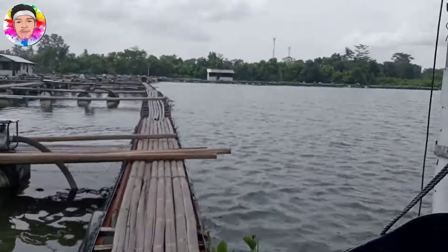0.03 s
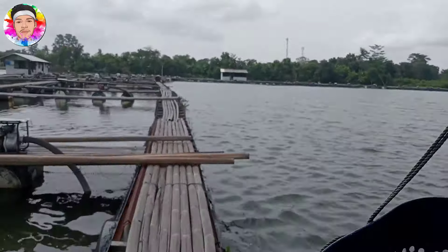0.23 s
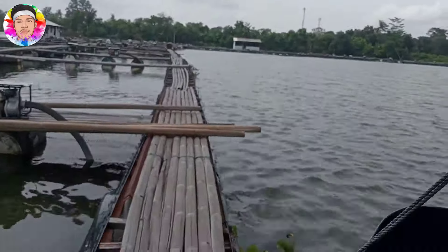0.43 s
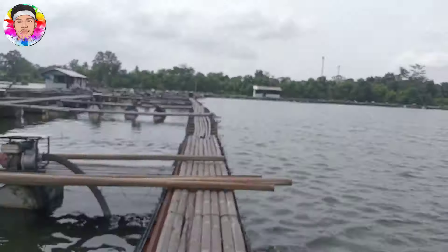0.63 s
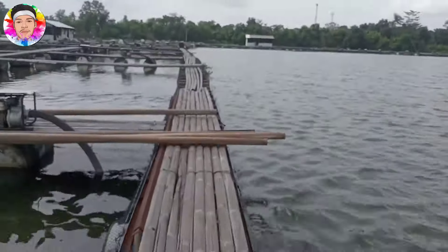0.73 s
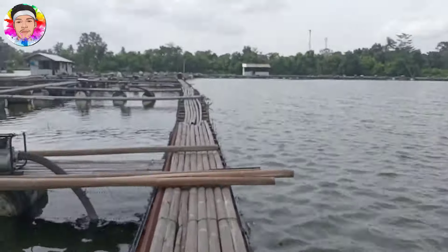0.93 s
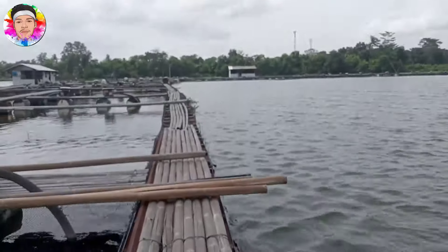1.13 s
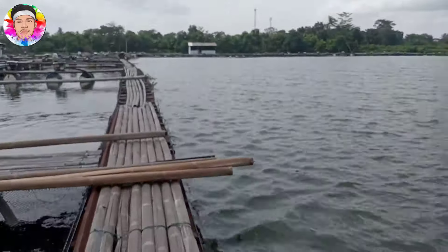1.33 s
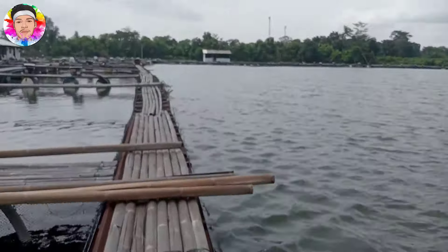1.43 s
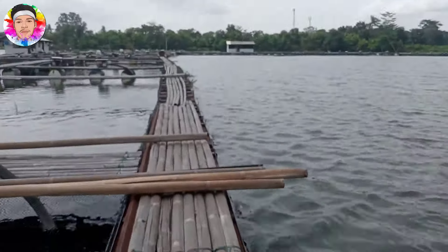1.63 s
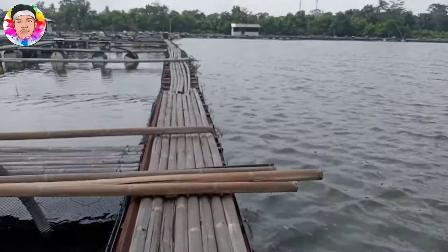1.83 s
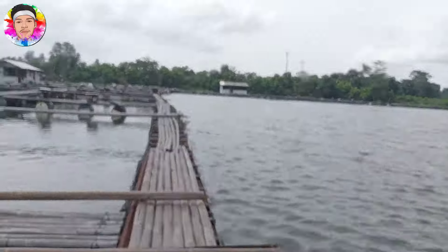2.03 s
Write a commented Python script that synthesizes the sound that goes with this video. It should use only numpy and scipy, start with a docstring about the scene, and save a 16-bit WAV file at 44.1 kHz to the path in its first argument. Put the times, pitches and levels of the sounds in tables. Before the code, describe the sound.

Footsteps knock on the hollow slats of a floating bamboo walkway at about 0.2, 0.7, 1.1 and 1.6 seconds, the second loudest. Soles scuff, with small dry snaps and loose slats rattling between steps. Low wind rumble and a soft hiss run throughout. The walkway groans softly near 0.4 and 1.8 seconds, and a distant bird whistles very faintly around 0.3 to 0.5 seconds.

```python
"""A floating walkway of bamboo slats on a lake, in light wind, with someone walking across it. Wind and the
swaying walkway rumble under a soft hiss, and a far bird whistles faintly. Each footstep lands as a few knocks
that ring the hollow slats, and the loose ones clatter on in between. The soles scuff the hard bamboo skin, dry
snaps and ticks sound, and the walkway groans as it flexes."""
import sys
import numpy as np
from scipy.fft import rfft, irfft, next_fast_len
from scipy.io import wavfile
from scipy.ndimage import uniform_filter1d, map_coordinates

SR = 44100
rng = np.random.default_rng(int(sys.argv[2]) if len(sys.argv) > 2 else 0)


def put_to_file(sound):
    """Save the sound as 16-bit audio at rate SR, in the file named by the first command-line argument."""
    columns = np.atleast_2d(sound).T  # one column per channel
    safe = np.clip(columns, -1, 1)
    whole_steps = np.round(safe * 32767)
    wavfile.write(sys.argv[1], SR, whole_steps.astype(np.int16))


N = 92610

# Low rumble of wind and the swaying walkway, swelling with its dull thumps: (time [s], level [dB])
RUMBLE_LEVEL = [(0,-26),(.19,-26.5),(.22,-22.5),(.3,-23.5),(.45,-21),(.6,-26.5),(.66,-28),(.79,-20.5),(.85,-27),(.96,-30),(1.05,-25),(1.11,-26.5),(1.26,-23.5),(1.33,-26),(1.52,-33),(1.65,-23),(1.75,-28.5),(1.86,-26),(1.93,-37),(1.99,-25),(2.1,-39.5)]
# Tone of the low rumble: (frequency [Hz], gain [dB])
RUMBLE_EQ = [(25, -52), (53, -7.5), (90, -1.5), (130, -0.5), (200, -5.5), (300, -22), (600, -80)]
# Tone of the airy hiss: (frequency [Hz], gain [dB])
HISS_EQ = [(100, -36.5), (200, -2.5), (370, -3.5), (780, -11.5), (1340, -21.5), (2000, -23), (2800, -29.5),
           (3900, -28), (5500, -46.5), (7150, -57.5), (15000, -79.5)]
# Bird whistles: (time [s], length [s], start pitch [Hz], end pitch [Hz], level [dB], rasp [Hz])
WHISTLES = [(.108, .05, 7400, 5500, -74, 90), (.315, .05, 3900, 3750, -49, 110),
            (.39, .08, 3800, 3650, -54, 110), (.495, .06, 3750, 3750, -52, 110)]
# The walkway flexing: (time [s], length [s], start pitch [Hz], end pitch [Hz], level [dB])
GROANS = [(.34, .06, 105, 80, -17), (.41, .095, 150, 122, -17), (1.765, .045, 160, 140, -19)]
# How hard the loose slats shake: (time [s], level [dB])
SHAKE_LEVEL = [(0,-29.5),(.1,-45.5),(.19,-38),(.36,-29.5),(.6,-45),(.7,-24.5),(.94,-34),(1.02,-42.5),(1.11,-36),(1.18,-25),(1.26,-33.5),(1.45,-38.5),(1.7,-28.5),(1.76,-40.5),(2.1,-32)]
# A light brush of the shoe: (time [s], length [s], pre-EQ level [dB], band centre [Hz])
SHOE_BRUSH = (1.95, .14, -65, 6500)
# Thin bright ticks: (time [s], relative level [dB])
TICKS = [(0.1918,-46.5),(.2295,-45),(0.66,-48),(0.7274,-53),(1.154,-40),(1.1593,-46.5),(1.504,-56.5),(1.548,-54),(1.595,-48),(1.612,-43.5),(1.955,-53),(1.982,-58.5)]
# Dry snaps: (time [s], pre-EQ level [dB], pitch [Hz], decay [s])
SNAPS = [(.042,-25.5,2030,0.0028),(.453,-31.5,2280,0.0034),(0.507,-34.5,1900,0.0031),(.7275,-22,1990,0.0028),(1.2198,-13.5,2000,0.00023),(1.2291,-4.5,2520,0.00029),(1.493,-29.5,1454,0.0071),(1.596,-25,3420,0.0023),(1.973,-28.5,3400,0.001)]
# Resonances of the hard bamboo skin: (frequency [Hz], bandwidth [Hz], relative gain [dB])
SKIN_MODES = [(1450, 37, -3), (2052, 140, 2), (2670, 130, 1.5), (3424, 150, 1.5), (4380, 550, -3.5)]
# Soles scuffing the bamboo: (time [s], relative level [dB], decay [s])
SCUFFS = [(0.045,-35,0.014),(0.205,-34,0.06),(0.228,-27.5,0.022),(0.259,-27,0.018),(0.301,-22.5,0.017),(0.453,-28.5,0.0048),(0.654,-14,0.0086),(0.726,-22,0.006),(0.922,-25,0.0025),(1.116,-29,0.022),(1.134,-25.5,0.02),(1.531,-30,0.0064),(1.592,-26.5,0.03),(1.64,-30.5,.025),(1.805,-32.5,0.029),(1.936,-32,0.0072)]
# Tone of the scuffs: (frequency [Hz], gain [dB])
SOLE_EQ = [(500, -32.5), (1000, 4), (1900, 1.5), (2800, -5.5), (4200, -6.5), (5500, -22), (7500, -35.5),
           (15000, -45)]
# Resonances of the hollow slats: (frequency [Hz], bandwidth [Hz], relative gain [dB])
SLAT_MODES = [(246, 72.5, 2.5), (319, 49, 4), (376.3, 44.6, 3.5), (511.5, 46, -1), (580.3, 32, -1.5),
              (669.6, 31, 0), (764, 76, -3.5), (917, 124, -7), (1138, 260, -12)]
# Feet knocking on the slats: (time [s], relative level [dB], band centre [Hz], clatter length [s])
KNOCKS = [(0.04,-18,860,0.015),(.21,-11.5,855,0.0082),(0.223,-10,323,0.005),(.246,-15,500,0.03),(0.272,-13,620,0.021),(0.308,-6.5,800,0.0036),(.317,-12.5,620,0.007),(.654,-4.5,602,0.0093),(0.669,1.5,440,0.0081),(0.682,-4,450,0.0059),(0.717,-9,610,0.0017),(0.729,-9.5,636,0.0054),(0.769,-12.5,330,0.034),(.85,-18,545,0.056),(0.924,-20,650,0.0046),(1.125,-5.5,666,0.002),(1.133,-6,400,0.0061),(1.145,-5.5,440,0.0066),(1.185,-16,465,0.027),(1.557,-16,316,0.0044),(1.593,-14,670,0.022),(1.611,-10,415,0.018),(1.636,-4,524,0.0078),(1.655,-13.5,460,0.017),(1.682,-14.5,770,0.0042),(1.774,-19,259,0.024)]

HISS_DB, HISS_FOLLOW = -34.5, 0.6  # follow: dB of hiss per dB of shaking
RATTLES_PER_S, RUSTLES_PER_S, RUSTLE_TRIM_DB = 700, 2500, -44
TICK_TRIM_DB, TICK_DECAY_S, FIZZ_TRIM_DB, FIZZ_DECAY_S = 0.5, .0006, -21.5, 0.026
SCUFF_TRIM_DB, SCUFF_ATTACK_S = 5, 0.0024
CRACKLES_PER_S, CRACKLE_BOOST_DB, PITCH_SCATTER = 250, 27, .06
KNOCK_TRIM_DB, CONTACTS_PER_S, FIRST_BLOW = -6, 1500, 2.01
SOFT_STRIKE_HZ, SNAP_TOP_HZ, MIX_TOP_HZ = 1740, 5800, 15500


def amp(db):
    """dB to gain."""
    return 10 ** (np.asarray(db) / 20)


def unit_rms(x):
    """Scale to rms 1."""
    return x / np.sqrt(np.mean(x ** 2) + 1e-20)


def eq_gain(points, f):
    """Gain of an EQ curve drawn on a log frequency axis."""
    hz, db = np.transpose(points)
    return amp(np.interp(np.log(f + 1), np.log(hz + 1), db))


def automation(points):
    """A fader ride, one value per sample."""
    return np.interp(np.arange(N) / SR, *np.transpose(points))


def wobble(per_s):
    """A smooth random curve through per_s knots a second."""
    knots = rng.standard_normal(int(N * per_s / SR) + 4)
    return map_coordinates(knots, [np.arange(N) * per_s / SR])


def filtered(x, response):
    """Run x through a frequency response."""
    size = next_fast_len(x.shape[-1] + 4096)
    spectrum = rfft(x, size) * response(np.fft.rfftfreq(size, 1 / SR))
    return irfft(spectrum, size)[..., :x.shape[-1]]


def band(f, hz, rel_width):
    """Resonant band-pass at hz; rel_width is 1/Q."""
    width = hz * rel_width
    return 1j * f * width / (hz * hz - f * f + 1j * f * width)


def slat_body(f):
    """Response of the hollow slats; a soft strike dulls the top."""
    modes = sum((-1) ** k * amp(db) * band(f, hz, width / hz)
                for k, (hz, width, db) in enumerate(SLAT_MODES))
    return modes / (1 + 1j * f / SOFT_STRIKE_HZ) ** 3


def contacts(size, per_s):
    """Sparse random impulses of scattered strength."""
    chance, strength = rng.random(size), rng.standard_normal(size)
    return (chance < per_s / SR) * strength


def place(track, start, sound):
    """Lay a sound into the track at start seconds."""
    part = track[round(start * SR):][:len(sound)]
    part += sound[:len(part)]


def glide(length, from_hz, to_hz, db, rasp_hz):
    """A gliding tone whose pitch trembles."""
    progress = np.linspace(0, 1, round(length * SR))
    tremble = unit_rms(uniform_filter1d(rng.standard_normal(SR // 4), size=60))[:len(progress)]
    hz = from_hz + (to_hz - from_hz) * progress ** 0.81 + rasp_hz * tremble
    envelope = np.abs(np.sin(np.pi * progress)) ** .5
    return amp(db) * envelope * np.sin(2 * np.pi * np.cumsum(hz) / SR)


def wind_and_sway():
    """The bed: lumpy rumble of wind and the swaying walkway, and a hiss that rises as the slats shake."""
    lumps = rng.standard_normal(N) * amp(2 * wobble(25))
    rumble = filtered(lumps, lambda f: eq_gain(RUMBLE_EQ, f))
    grain_db = np.clip(1.2 * wobble(40) + 1.5 * wobble(150), -5, 5)
    hiss = filtered(rng.standard_normal(N) * amp(grain_db), lambda f: eq_gain(HISS_EQ, f))
    shake_db = automation(SHAKE_LEVEL)
    hiss_db = HISS_DB + HISS_FOLLOW * (shake_db - shake_db.mean())
    return amp(automation(RUMBLE_LEVEL)) * unit_rms(rumble) + amp(hiss_db) * unit_rms(hiss)


def bird():
    """Thin raspy whistles from the shore."""
    out = np.zeros(N)
    for start, *whistle in WHISTLES:
        place(out, start, glide(*whistle))
    return out


def walkway_groans():
    """Low falling groans as the walkway flexes after a step."""
    out = np.zeros(N)
    for start, *tone in GROANS:
        place(out, start, glide(*tone, rasp_hz=12))
    return out


def slat_rattle():
    """The loose slats go on tapping one another between the knocks."""
    taps = contacts(N, RATTLES_PER_S) * amp(3.9 * wobble(30.62))
    return amp(automation(SHAKE_LEVEL)) * unit_rms(filtered(taps, slat_body))


def shoe_brush():
    """A soft bright swish as the shoe swings over the slats."""
    out = np.zeros(N)
    start, length, db, hz = SHOE_BRUSH
    swell = np.sin(np.linspace(0, np.pi, round(length * SR))) ** 2
    place(out, start, amp(db) * swell * rng.standard_normal(len(swell)))
    return filtered(out, lambda f: band(f, hz, rel_width=2.2) ** 2)


def ticks_and_rustle():
    """Top-end detail: tiny clicks with a fizzy tail, and a dry rustle that rides the shaking."""
    out, t = np.zeros(N), np.arange(SR // 10) / SR
    for start, db in TICKS:
        envelope = np.exp(-t / TICK_DECAY_S) + amp(FIZZ_TRIM_DB) * np.exp(-t / FIZZ_DECAY_S)
        place(out, start, amp(db + TICK_TRIM_DB) * envelope * rng.standard_normal(len(t)))
    out += amp(automation(SHAKE_LEVEL) + RUSTLE_TRIM_DB) * unit_rms(contacts(N, RUSTLES_PER_S))
    return filtered(out, lambda f: band(f, hz=10000, rel_width=2.4))


def dry_snaps():
    """Short dry snaps, each one quickly damped ring."""
    out, t = np.zeros(N), np.arange(SR // 20) / SR
    for start, db, hz, decay in SNAPS:
        place(out, start, amp(db) * np.exp(-t / decay) * np.sin(2 * np.pi * hz * t))
    return filtered(out, lambda f: band(f, hz=2800, rel_width=2) / np.sqrt(1 + (f / SNAP_TOP_HZ) ** 16))


def sole_scuffs():
    """Gritty bursts of the sole: a little hiss, plus crackles that each ring one mode of the skin."""
    out, t = np.zeros(N), np.arange(SR // 8) / SR
    for start, db, decay in SCUFFS:
        envelope = (1 - np.exp(-t / SCUFF_ATTACK_S)) * np.exp(-t / decay)
        grit = envelope * rng.standard_normal(len(t))
        for mode_hz, width, mode_db in SKIN_MODES:
            hz = mode_hz * (1 + PITCH_SCATTER * rng.standard_normal())
            crackles = envelope * contacts(len(t), CRACKLES_PER_S)
            grit += amp(CRACKLE_BOOST_DB + mode_db) * filtered(crackles, lambda f: band(f, hz, width / hz))
        place(out, start, amp(db + SCUFF_TRIM_DB) * grit)
    return filtered(out, lambda f: eq_gain(SOLE_EQ, f))


def foot_knocks():
    """A first blow, then a run of contacts that swells and dies, rings the slats in each knock's band."""
    out, t = np.zeros(N), np.arange(SR // 6) / SR
    for start, db, hz, length in KNOCKS:
        progress = t / max(length, .002)
        force = contacts(len(t), CONTACTS_PER_S) * (0.71 + progress) * np.exp(-progress ** 2)
        force[0] = FIRST_BLOW
        ring = filtered(force, lambda f: slat_body(f) * band(f, hz, rel_width=0.88))
        peak_rms = np.sqrt(np.max(uniform_filter1d(ring ** 2, size=400)) + 1e-12)  # loudest 9 ms
        place(out, start, amp(db + KNOCK_TRIM_DB) * ring / peak_rms)
    return out


def scene():
    """Mono mix: footsteps on top, then the walkway and the lake behind them."""
    steps = foot_knocks() + sole_scuffs() + dry_snaps() + ticks_and_rustle()
    return (steps + slat_rattle() + walkway_groans() + wind_and_sway() + bird() + shoe_brush())[None]


def record(dry):
    """Master chain: soft-clip the loudest peaks, then a brick-wall high cut."""
    clipped = dry / (1 + np.abs(dry / 1.1) ** 6) ** (1 / 6)
    return filtered(clipped, lambda f: f < MIX_TOP_HZ)


dry = scene()
out = record(dry)
put_to_file(out)
```